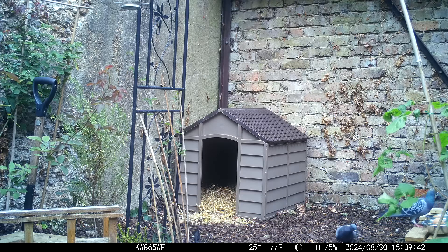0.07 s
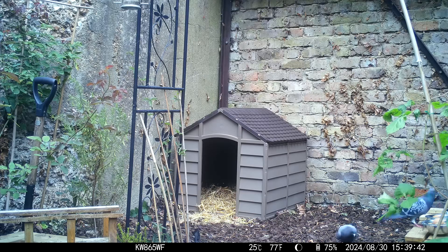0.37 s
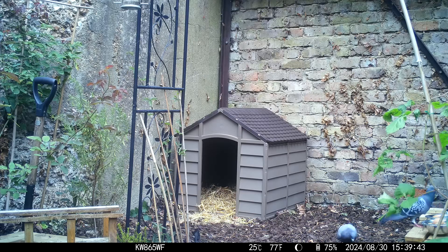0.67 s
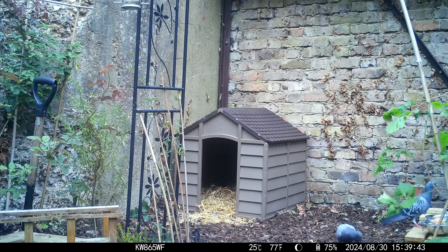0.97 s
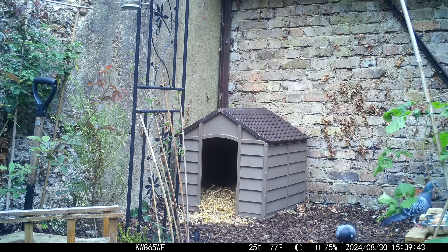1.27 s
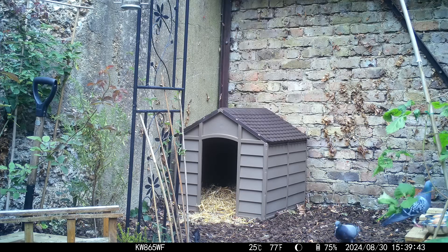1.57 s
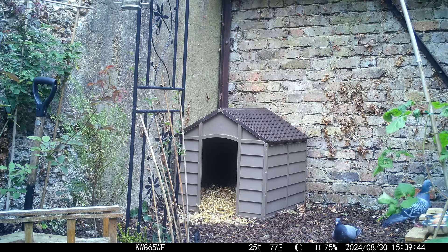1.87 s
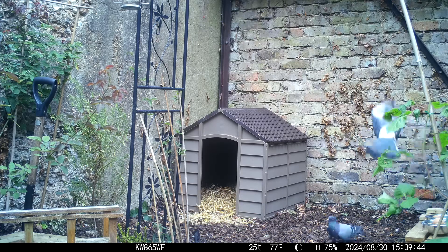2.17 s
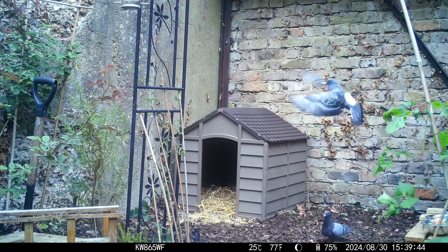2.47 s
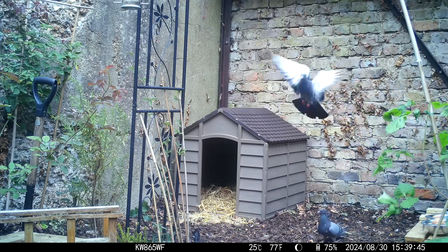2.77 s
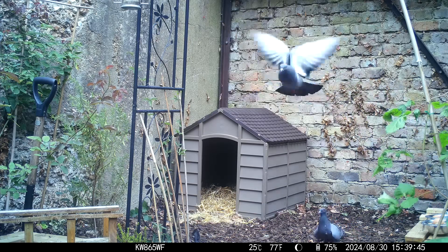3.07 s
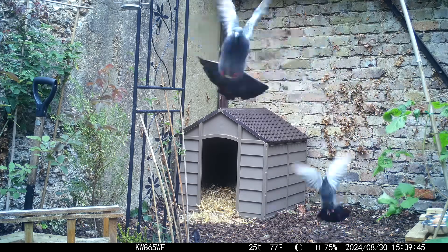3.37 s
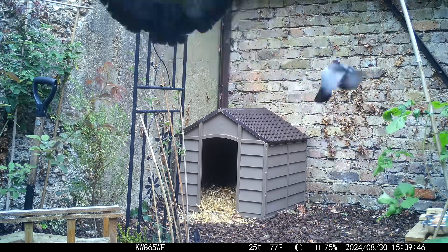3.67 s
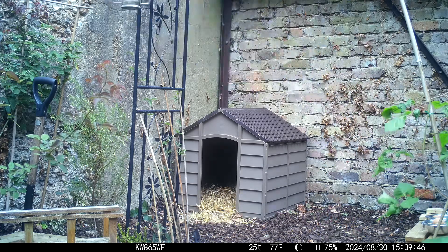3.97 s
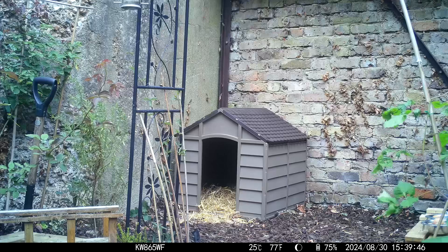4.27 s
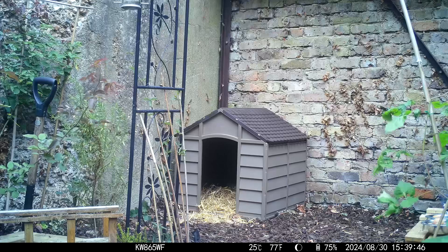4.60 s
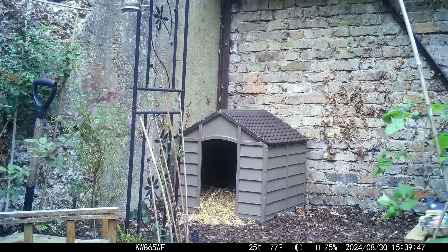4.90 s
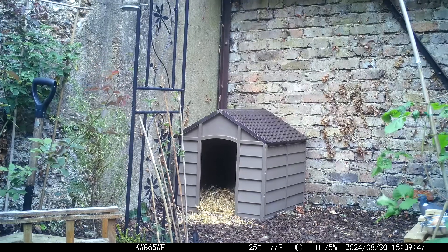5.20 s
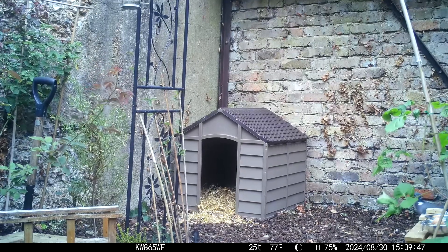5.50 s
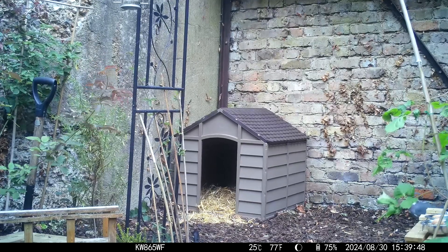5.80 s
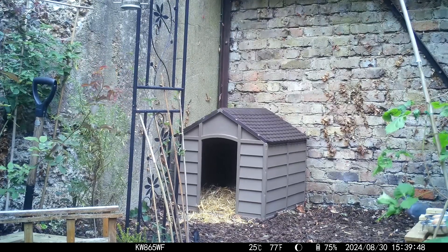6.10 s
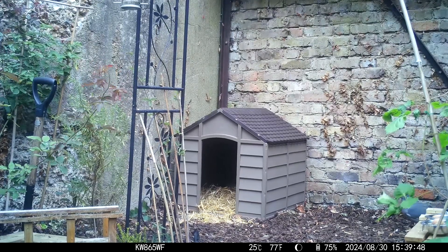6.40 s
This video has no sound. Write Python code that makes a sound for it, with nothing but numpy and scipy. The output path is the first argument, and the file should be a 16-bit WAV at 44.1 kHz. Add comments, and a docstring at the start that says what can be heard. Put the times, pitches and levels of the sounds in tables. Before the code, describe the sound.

A faint hiss and low rumble fill a small walled garden. Two pigeons take off with sharp wing claps and quick, swishing flaps that carry a buzzy whistle. The flapping grows loudest as they climb past the microphone, buffeting it with puffs of air. A few dull knocks sound close by, then the wing beats fade into the distance.

```python
"""Pigeons leaving a walled garden

Two pigeons take off and fly up past the microphone, over a low rumble and faint hiss. Each wing stroke
swishes, sets a flight feather fluttering in an arched whistle and pushes a puff of air; wing tips clap,
gusts buffet the microphone. A few dull knocks follow close by, and steady wing beats fade far off."""
import sys
import numpy as np
from scipy import signal
from scipy.fft import rfft, irfft, next_fast_len
from scipy.io import wavfile
from scipy.ndimage import uniform_filter1d

SR = 44100
rng = np.random.default_rng(int(sys.argv[2]) if len(sys.argv) > 2 else 0)


def materialize(psi):
    """Save the field psi as 16-bit PCM at rate SR to the path in sys.argv[1].

    A 1-D psi becomes a single channel; in a 2-D psi each row is a channel.
    """
    bounded = np.clip(np.atleast_2d(psi).T, -1, 1)
    quanta = np.round(bounded * 32767).astype(np.int16)
    wavfile.write(sys.argv[1], SR, quanta)


N = 284445


def from_db(db):
    """Decibels to gain."""
    return 10 ** (np.asarray(db) / 20)


def unit_rms(x):
    """Scale to unit power."""
    return x / np.sqrt(np.mean(x ** 2) + 1e-20)


def curve(points):
    """Join (time [s], value) points, sample by sample."""
    times, values = np.transpose(points)
    return np.interp(np.arange(N) / SR, times, values)


def drift(rate_hz):
    """Smooth random wander, rms 1."""
    pole = np.exp(-2 * np.pi * rate_hz / SR)
    wander = signal.lfilter([1], [1, -2 * pole, pole * pole], rng.standard_normal(N + SR))
    return unit_rms(wander[SR:])


def coloured(x, spectrum):
    """Give a steady excitation a spectrum; rms 1."""
    hz, db = np.transpose(spectrum)
    size = next_fast_len(N)
    log_hz = np.log(np.fft.rfftfreq(size, 1 / SR) + 1)
    gain = from_db(np.interp(log_hz, np.log(hz), db))
    return unit_rms(irfft(rfft(x, size) * gain, size)[:N])


def noise(spectrum):
    """Turbulence with a given spectrum."""
    return coloured(rng.standard_normal(N), spectrum)


def resonate(x, modes):
    """Parallel damped resonances, each (frequency [Hz], width [Hz], gain [dB])."""
    out = 0
    for hz, width_hz, db in modes:
        radius = np.exp(-np.pi * width_hz / SR)
        forward = np.array([1, 0, -1]) * (1 - radius ** 2) / 2
        feedback = [1, -2 * radius * np.cos(2 * np.pi * hz / SR), radius ** 2]
        out = out + from_db(db) * signal.lfilter(forward, feedback, x)
    return out


def add(track, start_s, sound):
    """Mix a sound in from start_s."""
    at = int(start_s * SR)
    part = sound[:max(N - at, 0)]
    track[at:at + len(part)] += part


def swell(s, half_s, shape=2):
    """A rise and fall around time s: its samples, their stage (-1 early, 0 top, 1 late) and height."""
    at = np.arange(max(int((s - 4 * half_s) * SR), 0), min(int((s + 4 * half_s) * SR), N))
    stage = (at / SR - s) / half_s
    return at, stage, np.exp(-np.abs(stage) ** shape)


def swell_power(rows, shape=2):
    """Summed power of swells, each (time [s], half length [s], level [dB])."""
    power = np.zeros(N)
    for s, half_s, db in rows:
        at, _, height = swell(s, half_s, shape)
        power[at] += (from_db(db) * height) ** 2
    return power


# The garden's steady hiss: (frequency [Hz], relative level [dB])
HISS_SPECTRUM = [(180, -2), (300, -7), (325, -6), (451, -10.5), (667, -12.5), (811, -13), (1320, -17),
                 (6530, -22), (12900, -21), (14800, -27.5)]


def background(hiss_db=-61, swell_hz=335, swell_width_hz=90):
    """A steady hiss all round, and one faint low swell before the take-off."""
    low_band = unit_rms(resonate(noise(FLURRY_SPECTRUM), [(swell_hz, swell_width_hz, 0)]))
    swell_level = np.sqrt(swell_power([(0.79, 0.33, -65.5)]))
    return from_db(hiss_db) * noise(HISS_SPECTRUM) + swell_level * low_band


def eddies(spectrum, span_s):
    """Low turbulence whose strength stays even over a short span."""
    air = noise(spectrum)
    local_power = uniform_filter1d(air ** 2, int(span_s * SR))
    return air / np.sqrt(local_power + 1e-3)


def air_level(gust_dbs, steady_db, stir_db, puff_db, puff_lag_s=.008, puff_stretch=1.57):
    """Strength of the low air: a steady part, the birds' stirring, a puff per stroke and the gusts."""
    near_db, stir_share = -38.5, 0.33   # the stirring takes a share of the rustle's swing about near_db
    stirred = from_db(stir_db + stir_share * (curve(PLUMAGE_RUSTLE) - near_db))
    puffs = swell_power([(s + puff_lag_s, puff_stretch * half_s, swish_db + puff_db)
                         for s, half_s, swish_db, *_ in WING_STROKES])
    gusts = swell_power([(s, half_s, db) for (s, half_s, *_), db in zip(MIC_GUSTS, gust_dbs)], shape=1.1)
    return np.sqrt(from_db(steady_db) ** 2 + (stirred - stirred.min()) ** 2 + puffs + gusts)


# Air at the microphone in three registers, lowest first: (frequency [Hz], relative level [dB])
SWAY_SPECTRUM = [(10, -6.5), (28, -2.5), (55, -4), (90, -34), (200, -89)]
BUFFET_SPECTRUM = [(35, -6), (75, 7), (130, 2.5), (220, -5), (330, -19.5), (700, -60)]
FLURRY_SPECTRUM = [(150, -9), (260, -2), (360, -1), (500, -5), (750, -6.5), (1500, -73)]
# Gusts on the microphone: (time [s], half length [s], sway [dB], buffet [dB], flurry [dB])
MIC_GUSTS = [(1.872, 0.031, -45, -40, -42), (2.465, 0.048, -49, -58, -68), (2.693, 0.017, -42, -61, -61),
             (3.422, 0.025, -50, -37.5, -34.5), (3.545, 0.083, -43, -44.5, -41.5),
             (4.345, 0.03, -39.5, -41, -60), (4.524, 0.043, -31, -32, -51), (4.725, 0.1, -42, -43.5, -41),
             (4.867, 0.079, -37, -34, -47), (5.016, 0.047, -31, -35, -44.5),
             (5.20, 0.082, -44.5, -47, -43.5), (5.603, 0.079, -39.5, -51, -59),
             (5.702, .026, -46, -33.5, -52), (5.78, 0.058, -40, -50, -61),
             (6.045, 0.062, -43, -49.5, -59.5), (6.362, 0.094, -51, -61, -65)]


def draught():
    """Outdoor rumble, swelling into lumpy buffets where the downwash reaches the microphone."""
    _, _, sway_dbs, buffet_dbs, flurry_dbs = np.transpose(MIC_GUSTS)
    sway = air_level(sway_dbs, steady_db=-67.5, stir_db=-45, puff_db=-12.5)
    buffet = air_level(buffet_dbs, steady_db=-65.5, stir_db=-50, puff_db=-25)
    flurry = air_level(flurry_dbs, steady_db=-93, stir_db=-49.5, puff_db=-21)
    return (sway * eddies(SWAY_SPECTRUM, span_s=0.17)
            + buffet * eddies(BUFFET_SPECTRUM, span_s=0.15)
            + flurry * eddies(FLURRY_SPECTRUM, span_s=0.13))


def garden_walls(x, t60_s=0.42, tail_db=-12, build_s=0.0086):
    """Close brick walls scatter a short tail back to the microphone."""
    t = np.arange(SR // 2) / SR
    envelope = np.exp(-np.log(1000) * t / t60_s) * np.minimum(t / build_s, 1)
    tail = rng.standard_normal(len(t)) * envelope
    tail /= np.sqrt(np.sum(tail ** 2))
    return x + from_db(tail_db) * signal.fftconvolve(x, tail)[:N]


def far_beats(start_s=6.015, period_s=0.13, first_db=-65.5, fade_db_per_s=22, top_hz=1660, arch=0.028):
    """Far from the microphone, each regular wing beat is a faint swish and one thin whistle."""
    out = np.zeros(N)
    air = noise(SWISH_SPECTRUM)
    wobble = 1 + 0.017 * drift(207)
    for s in np.arange(start_s, N / SR, period_s):
        at, stage, height = swell(s, half_s=0.04)
        hz = top_hz * (1 - arch * stage ** 2) * wobble[at]
        whistle = from_db(2.5) * np.sin(2 * np.pi * np.cumsum(hz) / SR)
        level = from_db(first_db - fade_db_per_s * (s - start_s))
        out[at] += level * height * (air[at] + whistle)
    return out


# Low thrums close to the microphone: (time [s], half length [s], level [dB], pitch [Hz])
CLOSE_THRUMS = [(3.440, .014, -27.5, 385), (3.549, .018, -36.5, 402.5), (3.907, .01, -34.5, 468),
                (5.695, .022, -36, 170)]


def thrums(sag=0.0405):
    """Air beaten close by hums briefly on a low, falling note."""
    out = np.zeros(N)
    for s, half_s, db, hz in CLOSE_THRUMS:
        at, stage, height = swell(s, half_s)
        phase = 2 * np.pi * np.cumsum(hz * (1 - sag * stage)) / SR
        out[at] += from_db(db) * height * np.sin(phase)
    return out


TOUCH_S = .015   # how far into a contact the touch falls


def contact(scrape_db, rise_s, decay_s):
    """Feathers brush in, touch and scrape off: gives the impulse and the scrape."""
    t = (np.arange(SR // 5) - int(TOUCH_S * SR)) / SR
    touch = 1. * (t == 0)
    envelope = np.exp(-np.abs(t) / np.where(t < 0, rise_s, decay_s))
    return touch, from_db(scrape_db) * rng.standard_normal(len(t)) * envelope


def softened(x, cutoff_hz):
    """A feathered contact has little treble; peak 1."""
    x = signal.sosfilt(signal.butter(3, cutoff_hz, fs=SR, output="sos"), x)
    return x / np.abs(x).max()


# Resonances of the perch: (frequency [Hz], width [Hz], gain [dB])
PERCH_MODES = [(343, 21, 5), (520, 74, 3), (754, 190, -8.5), (1170, 600, -3.5), (2830, 850, 1)]
# Dull knocks near the microphone: (time [s], level [dB], thud pitch [Hz], scuff t60 [s])
NEAR_KNOCKS = [(4.635, -19, 900, 0.1), (4.6449, -16, 780, 0.062), (4.7095, -14, 905, 0.074),
               (4.72, -22, 900, 0.078), (4.775, -24, 690, 0.054), (4.7853, -19, 686, 0.086),
               (5.009, -18.5, 1010, 0.051), (5.179, -12, 440, 0.038), (5.1904, -30, 395, 0.051),
               (5.260, -33, 604, 0.053)]


def knocks(gain_db=-1, thud_db=8, thud_damping=.55):
    """A blunt touch gives a thud of a cycle or two; with a short scuff it also rings the perch."""
    out = np.zeros(N)
    for s, db, hz, t60_s in NEAR_KNOCKS:
        touch, scuff = contact(scrape_db=-17, rise_s=0.0026, decay_s=t60_s / np.log(1000))
        thud = resonate(touch, [(hz, thud_damping * hz, thud_db)])
        perch = resonate(touch + scuff, PERCH_MODES)
        add(out, s - TOUCH_S, from_db(db + gain_db) * softened(thud + perch, cutoff_hz=2.66 * hz))
    return out


# The colour of a wing clap: (frequency [Hz], width [Hz], gain [dB])
WING_TIP_MODES = [(800, 830, -5), (1720, 1100, 4.5), (2600, 580, 4), (4260, 2600, -50)]
# Claps as the birds climb past: (time [s], peak level [dB], slap decay [s], treble cutoff [Hz])
WING_CLAPS = [(1.7953, -21.5, 0.0019, 4240), (1.851, -11.5, 0.0031, 3430), (1.8621, -18.5, 0.0027, 3200),
              (1.9071, -18, 0.0087, 5030), (2.033, -24.5, 0.0023, 3970), (2.5762, -29, 0.0017, 4500),
              (2.82, -31, 0.0091, 4000), (2.9592, -31.5, 0.0035, 4040), (3.0165, -22, 0.0081, 4470),
              (3.0498, -28, .003, 5470), (3.06, -25.5, 0.0046, 8000), (3.085, -22, 0.0061, 4500),
              (3.4148, -17, 0.0042, 7150), (3.565, -28, 0.0045, 7000), (3.66, -13, 0.0081, 5870),
              (3.6916, -14, 0.00084, 3950), (3.808, -20.5, .004, 3850), (3.9372, -17.5, 0.0035, 4130),
              (4.0641, -22, 0.0056, 5500), (5.0081, -34, 0.004, 3500), (5.0972, -29.5, 0.0046, 2790),
              (5.179, -28, 0.0036, 3000)]


def claps():
    """Wing tips meet in a sharp crack, then the vanes slap shut over a few milliseconds."""
    out = np.zeros(N)
    for s, peak_db, slap_s, cutoff_hz in WING_CLAPS:
        crack, slap = contact(scrape_db=-16, rise_s=0.00061, decay_s=slap_s)
        clap = softened(resonate(crack + slap, WING_TIP_MODES), cutoff_hz)
        add(out, s - TOUCH_S, from_db(peak_db) * clap)
    return out


# Air rushing through feathers: (frequency [Hz], relative level [dB])
SWISH_SPECTRUM = [(240, -18), (400, -6), (431, -7), (541, -6), (754, 0.5), (1170, -5), (1580, -2),
                  (1730, -3.5), (2760, 1), (4980, -18), (6050, -22), (9810, -28.5), (13300, -39.5),
                  (14800, -55)]


def feathers(ticks_per_s=900, spread_db=3.5, ticks_db=-5):
    """Rushing air plus the tiny ticks of feathers sliding over each other."""
    ticks = (rng.random(N) < ticks_per_s / SR) * rng.choice([-1, 1], N)
    strengths = from_db(spread_db * np.minimum(rng.exponential(1, N), 4))
    air = rng.standard_normal(N)
    return coloured(air + from_db(ticks_db) * unit_rms(ticks * strengths), SWISH_SPECTRUM)


# Plumage between strokes, louder as the birds near the microphone: (time [s], level [dB])
PLUMAGE_RUSTLE = [(1.5, -71), (1.69, -61.5), (1.95, -44), (2.01, -47.5), (2.16, -59), (2.44, -61),
                  (2.59, -45), (2.95, -52.5), (3.19, -38.5), (3.46, -43.5), (3.62, -32.5), (3.77, -35.5),
                  (4.27, -44), (4.66, -40), (4.77, -43), (5.41, -56.5), (6.17, -64), (6.45, -65.5)]


def rustle_level(moving_s=1.63, fade_in_s=.15, gain_db=-2, clumps_db=1.5):
    """Strength of the plumage's uneven rustle, which sets in as the birds begin to move."""
    moving = curve([(moving_s - fade_in_s, 0), (moving_s, 1)])
    return moving * from_db(curve(PLUMAGE_RUSTLE) + gain_db + clumps_db * drift(60))


# Overtones of a fluttering feather: (multiple of the pitch, relative level [dB])
FEATHER_OVERTONES = [(2, 1.5), (3, 3), (4, -2), (5, -11.5), (6, -16)]


def flutter(hz, bright_db, rasps, favour_db=3):
    """A fluttering flight feather buzzes on a moving pitch; each stroke favours other overtones."""
    phase = 2 * np.pi * np.cumsum(hz) / SR
    favours = unit_rms(from_db(favour_db * rng.standard_normal(len(FEATHER_OVERTONES))))
    overtones = sum(from_db(db) * favour * rasp * np.sin(multiple * phase + rng.uniform(0, 2 * np.pi))
                    for (multiple, db), favour, rasp in zip(FEATHER_OVERTONES, favours, rasps))
    return np.sin(phase) + from_db(bright_db) * overtones


# Strokes of both birds, up and past the microphone: (time of top speed [s], half length [s],
# swish level [dB], whistle level [dB], whistle pitch [Hz], glide [share of the pitch])
WING_STROKES = [ (1.716, 0.012, -51.5, -58, 820, 0), (1.783, .01, -46.5, -64, 800, 0),
                (1.822, 0.024, -44, -46, 950, -0.0033), (1.878, 0.027, -32, -44, 850, 0.045),
                (1.939, 0.015, -34.5, -40, 920, 0.0038), (2.007, 0.024, -38.5, -51, 780, 0.032),
                (2.072, .025, -47.5, -51, 830, 0), (2.155, 0.029, -47.5, -53.5, 800, 0.13),
                (2.335, 0.025, -55, -63, 680, -0.0077), (2.423, .02, -45.5, -39.5, 825, 0.068),
                (2.490, 0.035, -44.5, -48, 780, -.06), (2.572, .023, -50.5, -45.5, 790, -0.04),
                (2.625, .016, -43.5, -46, 880, -0.11), (2.7, .015, -45, -43, 790, -0.0041),
                (2.742, .017, -40.5, -41.5, 910, 0.093), (2.865, .028, -44, -48.5, 830, -0.035),
                (3.000, .03, -44, -59, 680, 0), (3.067, 0.063, -37, -65, 720, .1),
                (3.142, .035, -33, -41, 860, .14), (3.228, 0.014, -38.5, -42, 840, -0.01),
                (3.303, .034, -45, -46.5, 700, -.09), (3.434, 0.019, -27.5, -59, 780, -0.03),
                (3.474, 0.033, -30, -44, 880, -0.026), (3.554, 0.015, -32.5, -41, 800, -.05),
                (3.585, 0.014, -30, -32, 810, -0.1), (3.616, .015, -33, -54, 800, -0.11),
                (3.679, .012, -28.5, -48, 800, -0.0084), (3.707, 0.0072, -30, -33.5, 840, 0.15),
                (3.725, .011, -22, -25, 825, -.11), (3.763, 0.019, -32, -60, 700, -0.012),
                (3.818, 0.014, -32.5, -48, 820, .04), (3.858, .022, -27, -27.5, 745.3, -.18),
                (3.97, 0.012, -32, -33.5, 740, -0.15), (4.009, .025, -31.5, -30, 749.5, -.19),
                (4.096, .035, -40, -39.5, 810, -0.11), (4.146, 0.029, -38, -37.5, 680, 0.17),
                (4.223, 0.024, -41, -48, 790, 0.09), (4.304, 0.023, -39.5, -39.5, 680, .13),
                (4.352, .018, -35, -37, 770, 0), (4.475, .027, -35.5, -37.5, 805, 0),
                (4.522, .018, -45, -44, 815, -0.022), (4.591, 0.024, -35, -39.5, 790, -.12),
                (4.643, .016, -35.5, -38, 750, -0.069), (4.696, 0.029, -45, -40, 880, 0),
                (4.825, 0.025, -43, -46.5, 840, .07), (4.89, .022, -54, -43.5, 750, 0),
                (4.951, 0.02, -54, -47, 810, 0.024), (5.058, .022, -51.5, -46.5, 770, 0),
                (5.201, 0.011, -44, -57, 800, 0), (5.296, 0.044, -52.5, -55, 780, .06),
                (5.445, .03, -52, -57, 820, 0.017), (5.614, .026, -50, -65, 780, -0.016),
                (5.739, 0.033, -50.5, -65, 780, .04), (5.859, .021, -53.5, -64, 800, -.04)]


def swishes(gain_db=0.2):
    """Air rushes through the feathers in each stroke, over the rustle of the plumage."""
    strokes = swell_power([(s, half_s, db + gain_db) for s, half_s, db, *_ in WING_STROKES], shape=0.86)
    return np.sqrt(strokes + rustle_level() ** 2) * feathers()


def whistles(arch=.11, waver=.022, flicker_db=1.8, rasp_db=3, overtone_db=-6, swish_share=0.59):
    """A flight feather flutters while the wing is fast; its pitch runs along a tilted arch."""
    out = np.zeros(N)
    wobble = 1 + waver * drift(202)
    flicker = from_db(flicker_db * drift(89))
    rasps = np.array([from_db(rasp_db * drift(90)) for _ in FEATHER_OVERTONES])   # overtones come and go
    for s, half_s, swish_db, whistle_db, pitch_hz, glide in WING_STROKES:
        at, stage, height = swell(s, 1.1 * half_s, shape=4.1)
        arc = 2 * np.tanh(stage / 2)
        sag = arch * rng.uniform(.5, 1.5) * arc ** 2   # the pitch drops at both ends of the stroke
        hz = pitch_hz * (1 + glide * arc - sag) * wobble[at]
        bright_db = overtone_db + swish_share * (swish_db - whistle_db)   # more swish, more buzz
        out[at] += from_db(whistle_db) * height * flicker[at] * flutter(hz, bright_db, rasps[:, at])
    return out


def scene():
    """One microphone between the walls: the birds, the moving air and the background."""
    birds = swishes() + whistles() + thrums() + far_beats() + claps() + knocks()
    return (garden_walls(birds) + draught() + background())[None]


def record(dry):
    """The top is cut steeply above 14.8 kHz."""
    return signal.sosfilt(signal.ellip(10, .1, 70, 14800, fs=SR, output="sos"), dry)


dry = scene()
out = record(dry)
materialize(out)
```